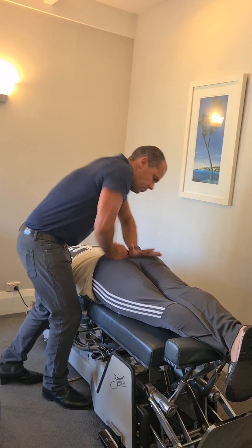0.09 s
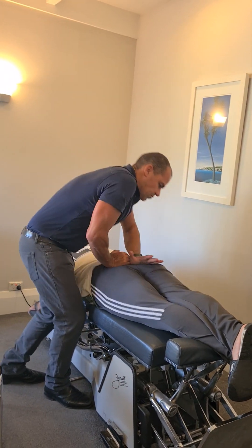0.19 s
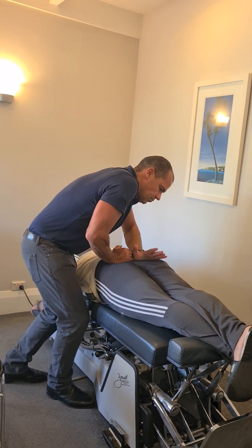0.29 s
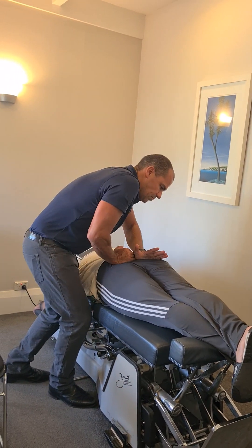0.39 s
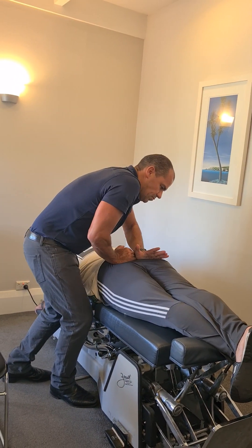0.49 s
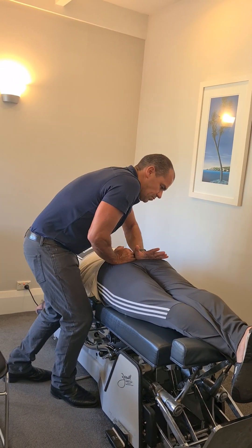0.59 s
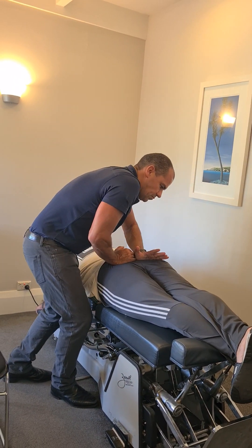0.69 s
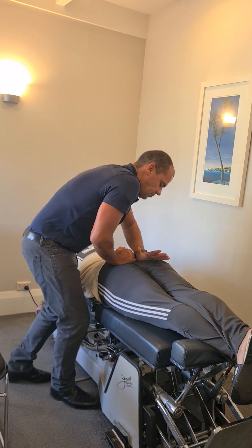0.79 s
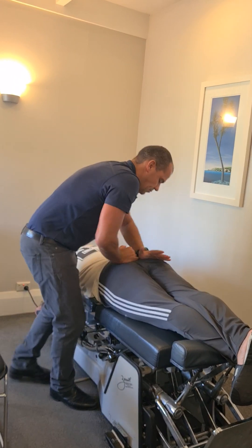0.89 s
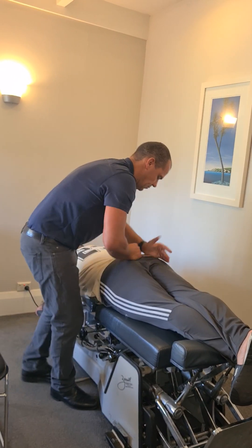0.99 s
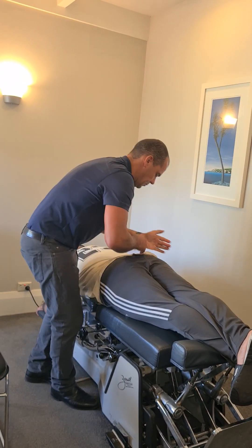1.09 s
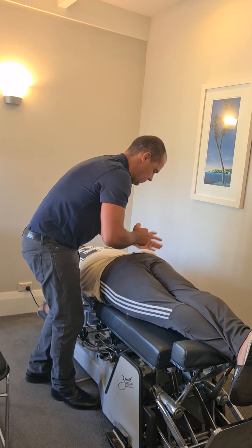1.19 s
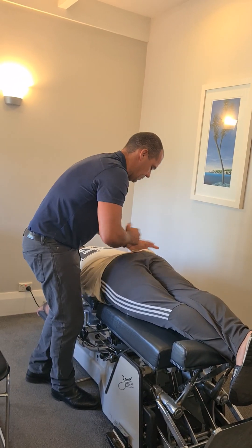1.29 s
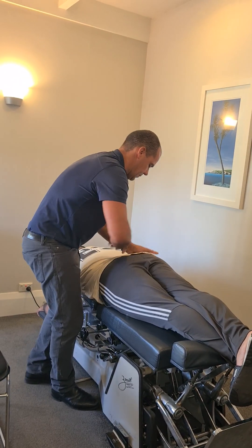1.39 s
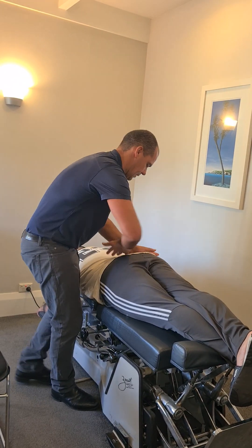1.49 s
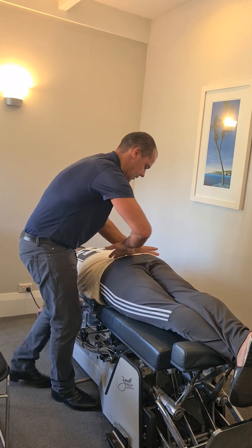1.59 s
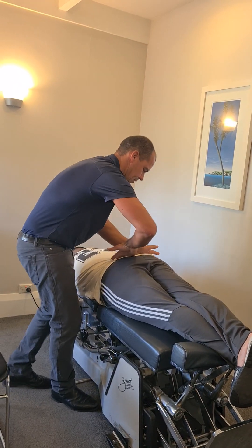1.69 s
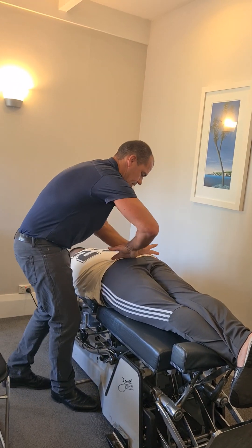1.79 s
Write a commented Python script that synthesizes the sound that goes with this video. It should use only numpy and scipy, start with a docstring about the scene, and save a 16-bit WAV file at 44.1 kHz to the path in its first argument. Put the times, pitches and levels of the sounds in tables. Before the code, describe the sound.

A padded treatment table section drops with a loud clack, then is lifted with clunks and hiss

```python
"""Padded table section dropped and lifted

A padded section of a treatment table drops onto its stop with a loud clack and rattles, in a small quiet room.
A second later the mechanism lifts it: a latch clack, a puff of air, dull thuds, a fading hiss of vented air.
Contacts are filtered impulses that ring the frame's modes; air, cloth and scrapes are shaped, coloured noise.
Decaying sines make the table rock and boom. A faint rustle opens the scene over a low hum and dull room noise."""
import sys
import numpy as np
from scipy import signal
from scipy.fft import rfft, irfft
from scipy.io import wavfile
from scipy.ndimage import uniform_filter1d

SR = 44100
rng = np.random.default_rng(int(sys.argv[2]) if len(sys.argv) > 2 else 0)


def file_out(sig):
    """Save sig as 16-bit WAV at sys.argv[1]."""
    # one column per channel
    cols = np.atleast_2d(sig).T
    # limit, then scale
    lim = np.clip(cols, -1, 1)
    pcm = np.round(lim * 32767).astype(np.int16)
    wavfile.write(sys.argv[1], SR, pcm)


N = 79380

# Stereo width of the room's sound. Each row: frequency in Hz, side level against mid in dB.
SIDE_SHARE = [(50, -21), (170, -20), (350, -9.5), (700, -3.5), (1400, 0.5), (15000, 1)]


def drop_clacks(walls):
    """Impact excitation: the section hits its stop and rebounds, each contact a broadband push."""
    # Each row: start in seconds, level in dB, brightness in dB per octave.
    drop_hits = [(.2424, 35, -2), (.2490, 15.5, 3), (.2575, 22, 3), (.2650, 2, -8), (.2890, 20.5, -5)]
    # Colour of the contact. Each row: frequency in Hz, gain in dB.
    drop_colour = [(40, -29.5), (80, -13.5), (130, -2.5), (200, -2), (290, -2), (400, -8), (500, 2.5),
                   (630, 7.5), (800, -5), (1120, 2), (1400, -4), (2000, -2.5), (2700, -12.5), (5000, -14),
                   (9000, -21.5), (10800, -25.5), (15000, -25)]
    return blows(drop_hits, drop_colour, grind_s=0.0035, ring_db=-55, walls=walls)


def latch_clacks(walls):
    """Impact excitation: the latch catches as the section is lifted, with a shorter chatter than the drop."""
    # Each row: start in seconds, level in dB, brightness in dB per octave.
    latch_hits = [(1.2010, 18, 3), (1.2045, 19, -2), (1.2290, 14.5, -6.5), (1.2585, 5, 7), (1.275, 7, 0.5)]
    # Colour of the contact. Each row: frequency in Hz, gain in dB.
    latch_colour = [(50, -19.5), (130, -5.5), (260, 6.5), (450, -4.5), (800, -4), (1150, 1.5), (1500, -1.5),
                    (2000, -1.5), (2700, -15), (4000, -13.5), (7500, -28), (15000, -34)]
    return blows(latch_hits, latch_colour, grind_s=0.002, ring_db=-55, walls=walls)


def padded_thuds(walls):
    """Cushioned impact: padding at the end of the travel absorbs the treble and leaves a dull bump."""
    # Each row: start in seconds, level in dB, brightness in dB per octave.
    thud_hits = [(.2975, 20.5, -3.5), (1.234, -1, 4), (1.264, 13.5, -4), (1.3020, 23, 1.5), (1.3150, 21, 3),
                 (1.346, -4.5, -8), (1.484, 4, -3), (1.7765, 13.5, .5)]
    # Colour of the contact. Each row: frequency in Hz, gain in dB.
    thud_colour = [(50, -10), (85, 2), (130, 2), (190, 4.5), (260, 7), (360, -0.5), (520, 6.5), (680, 3),
                   (820, -12), (1200, -22.5), (2500, -36.5), (9000, -86.5)]
    return blows(thud_hits, thud_colour, grind_s=0.01, ring_db=-55.5, walls=walls)


def blows(rows, points, grind_s, ring_db, walls):
    """Linear response to impact: a push with a brief chatter fills the room; the push also rings the frame."""
    chatter_db = 3  # energy of the chatter against the push that starts it
    pushes, contacts = 0, 0
    for start, db, tilt_db in rows:
        impulse = np.eye(1, N, int(start * SR))[0]
        push = undb(db) * colour(impulse, points, tilt_db)
        chatter = rng.standard_normal(N) * np.exp(-since(0) / grind_s)
        chatter = undb(chatter_db) * chatter / np.linalg.norm(chatter)
        contact = even(np.eye(1, N)[0] + chatter)
        pushes = pushes + push
        contacts = contacts + convolve(push, contact)
    return convolve(contacts, walls) + undb(ring_db) * convolve(pushes, frame())


def frame():
    """Modal ringing: the steel frame's decaying modes, the higher ones out of step at the two microphones."""
    # Each row: frequency in Hz, relative level in dB, 60 dB decay time in seconds.
    modes = [(176.44, -2, .5), (226, -4, 0.67), (256.5, 2.5, 0.43), (355.4, 1, 0.55), (471.5, -3, .36),
             (491.8, -0.5, 0.36), (616, -6, 0.12), (593, -5, 0.37), (648, -7.5, 0.35), (694, -8, .38),
             (1128, 0, 0.28), (1495, -7, .3), (1946, -5.5, 0.29)]
    rise_s = 0.0068
    t, out = since(0), 0
    for hz, db, t60 in modes:
        lead = np.arctan(undb(at(SIDE_SHARE, hz))) * rng.choice([-1, 1]) * np.array([[1], [-1]])
        out = out + undb(db) * np.cos(2 * np.pi * hz * t + lead) * fade(t, t60)
    return out * (1 - np.exp(-t / rise_s))


def sway():
    """Damped resonance: after each jolt the loaded table rocks deeply and its padded body booms."""
    # Each row: start in seconds, level of the rocking in dB, level of the boom in dB, both before decay.
    jolts = [(.243, -32, -31), (0.293, -21, -18.5), (0.579, -38, -60.5), (0.751, -33, -59),
             (1.188, -22.5, -26.5), (1.286, -19, -23.5), (1.534, -24.5, -40.5), (1.729, -36.5, -49)]
    rock_hz, boom_hz = 45.5, 134.5
    rise_s, rock_t60_s, boom_t60_s = 0.021, 0.45, 0.45
    out = 0
    for start, rock_db, boom_db in jolts:
        t = since(start)
        rock = undb(rock_db) * np.sin(2 * np.pi * rock_hz * t) * fade(t, rock_t60_s)
        boom = undb(boom_db) * np.sin(2 * np.pi * boom_hz * t) * fade(t, boom_t60_s)
        out = out + (rock + boom) * np.minimum(t / rise_s, 1)
    return out


def valves(walls):
    """Turbulent jet noise: short puffs from the valves and the long hiss of the slowly emptying cylinder."""
    # Each row: start in seconds, level in dB before the room, attack in seconds, hold in seconds,
    # decay in dB per second.
    puff_rows = [(1.255, -28, 0.0012, .02, 700), (1.485, -26, .005, 0.028, 223)]
    # Colours of the puffs and of the hiss. Each row: frequency in Hz, relative level in dB.
    puff_colour = [(200, -0.5), (700, 4), (1800, 0.5), (2800, 1.5), (4700, -3), (7000, -0.5), (9000, 5),
                   (10500, -1.5), (12000, 1.5), (14000, 2.5), (16000, 7.5)]
    vent_colour = [(150, 5.5), (600, -19.5), (1300, -8.5), (2500, -4), (3300, -2.5), (4400, 2),
                   (6500, -4.5), (8500, -8.5), (10500, -15), (12300, -8.5), (14000, -3), (16000, -10)]
    direct_db = -10.5  # the valves point into the open
    puffs = sum(rush(rng.standard_normal(N), puff_colour, *row) for row in puff_rows)
    vent = rush(rng.standard_normal(N), vent_colour,
                start=1.482, db=-33, attack=0.012, hold=0.086, fall_db=49)
    air = puffs + vent
    return convolve(air, walls) + undb(direct_db) * air


def slides():
    """Friction noise: the section scrapes in its guides just before the drop and before the latch."""
    # Each row: start in seconds, level in dB, attack in seconds, hold in seconds, decay in dB per second.
    scrapes = [(.219, -35, .022, .002, 900), (1.183, -42, .016, .002, 900)]
    # Colour of the scrape. Each row: frequency in Hz, relative level in dB.
    scrape_colour = [(80, -2), (250, 0), (600, 0), (1300, -4), (2300, -10), (4000, -19), (8000, -24),
                     (15000, -34)]
    return sum(rush(diffuse(), scrape_colour, *row) for row in scrapes)


def cloth():
    """Friction noise: clothes and padding rustle under the hands, soft in the treble."""
    # Each row: start in seconds, level in dB, attack in seconds, hold in seconds, decay in dB per second.
    presses = [(-.03, -48, .02, 0.47, 64)]
    # Colour of the rustle. Each row: frequency in Hz, relative level in dB.
    cloth_colour = [(80, 5.5), (170, 8.5), (350, 1.5), (600, -2.5), (1200, -4.5), (2200, -12),
                    (4800, -20.5), (7000, -29.5), (15000, -34)]
    return sum(rush(diffuse(), cloth_colour, *row) for row in presses)


def rush(noise, points, start, db, attack, hold, fall_db):
    """Amplitude envelope: coloured noise opens linearly, holds and dies away exponentially."""
    opening = np.minimum(since(start) / attack, 1)
    closing = undb(-fall_db * since(start + attack + hold))
    return level(colour(noise, points), db) * opening * closing


def hum():
    """Line spectrum: steady tones of a machine, each wavering slowly in level."""
    # Each row: frequency in Hz, middle level in dB.
    lines = [(48.4, -46), (96.9, -58), (242.2, -54), (538, -70), (598, -67)]
    waver_db = 2
    t, out = since(0), 0
    for hz, db in lines:
        strength = undb(db + waver_db * walk(11))
        out = out + strength * np.sin(2 * np.pi * (hz * t + rng.random()))
    return out


def room_noise():
    """Diffuse sound field: steady dull noise arriving from all around."""
    # Each row: frequency in Hz, relative level in dB per Hz.
    noise_colour = [(20, -4), (44, -5.5), (70, -17.5), (170, -8), (260, -17), (400, -20.5), (600, -22.5),
                    (1100, -24), (2000, -35.5), (3200, -42.5), (5000, -55.5), (15000, -73.5)]
    return level(colour(diffuse(), noise_colour), -49)


def diffuse():
    """Spatial coherence: noise at two microphones, alike in the bass and unrelated in the treble."""
    mid, side = rfft(rng.standard_normal((2, 2 * N)))
    share = undb(at(SIDE_SHARE, bins()))
    left_right = mid + share * side * np.array([[1], [-1]])
    return irfft(left_right / np.sqrt(1 + share ** 2))[:, :N]


def room():
    """Reverberation: direct sound, then reflections that build up and decay octave by octave."""
    # Each row: frequency in Hz, 60 dB decay time in seconds.
    decay_times = [(60, 0.79), (130, 0.37), (250, 0.44), (500, 0.38), (1000, .4), (2000, .37), (4000, 0.3),
                   (8000, 0.29), (15000, 0.2)]
    # Direct sound against the reflections; the table shades the treble.
    # Each row: frequency in Hz, relative level in dB.
    direct_colour = [(60, -7), (500, -3), (1200, -9), (3000, -20), (15000, -24)]
    gap_s, build_s = 0.00033, 0.0037
    t, noise, tail = since(gap_s), rfft(diffuse(), 2 * N), 0
    centres = 62.5 * 2. ** np.arange(9)
    for hz in centres:
        octaves_away = np.minimum(abs(np.log2(np.clip(bins(), centres[0], centres[-1]) / hz)), 1)
        mask = np.cos(np.pi / 2 * octaves_away) ** 2
        band = irfft(noise * mask)[:, :N]
        # smooth the band's chance swings in level before it decays
        power = uniform_filter1d(np.mean(band ** 2, axis=0), size=700)
        band = band / np.sqrt(power + 1e-18)
        shape = (1 - np.exp(-t / build_s)) * fade(t, at(decay_times, hz))
        tail = tail + band * shape * np.sqrt(np.mean(mask ** 2) / np.sum(shape ** 2))
    return even(colour(np.eye(1, N), direct_colour) + tail)


def undb(db):
    """Logarithmic level: decibels to amplitude gain."""
    return 10 ** (np.asarray(db) / 20)


def level(x, db):
    """Root-mean-square level: scale a sound to it."""
    return x * undb(db) / np.sqrt(np.mean(x ** 2))


def at(points, hz):
    """Logarithmic pitch scale: read a table by interpolating along log frequency."""
    f, v = np.array(points, float).T
    return np.interp(np.log(np.maximum(hz, 1)), np.log(f), v)


def bins():
    """Discrete spectrum: frequencies for twice the scene's length."""
    return np.arange(N + 1) * SR / (2 * N)


def colour(x, points, tilt_db=0):
    """Minimum-phase filtering: a causal filter through (Hz, dB) points, with a tilt in dB per octave."""
    # the tilt turns about 700 Hz and levels off below 120 Hz and above 5 kHz
    gain_db = at(points, bins()) + tilt_db * np.log2(np.clip(bins(), 120, 5000) / 700)
    # folding the cepstrum onto positive time makes the filter causal
    cepstrum = irfft(np.log(undb(gain_db)))
    cepstrum[1:N] *= 2
    cepstrum[N + 1:] = 0
    return irfft(rfft(x, 2 * N) * np.exp(rfft(cepstrum)))[..., :N]


def even(x):
    """Spectral whitening: level a burst's spectrum in bands about 40 Hz wide, to near unit energy."""
    spectrum = rfft(x, 2 * N)
    power = np.atleast_2d(abs(spectrum) ** 2).mean(axis=0)
    for _ in range(3):
        power = uniform_filter1d(power, size=int(40 * 2 * N / SR))
    return irfft(spectrum / np.sqrt(abs(power) + 1e-12))[..., :N]


def convolve(x, response):
    """Linear superposition: play a sound through an impulse response."""
    return irfft(rfft(x, 2 * N) * rfft(response, 2 * N))[..., :N]


def since(start):
    """Causality: seconds since a moment, zero before it."""
    return np.maximum(np.arange(N) / SR - start, 0)


def fade(t, t60):
    """Exponential damping: decay by 60 dB in t60 seconds."""
    return np.exp(-np.log(1000) * t / t60)


def pan(x, db):
    """Level difference between ears: make the left channel louder than the right by db."""
    return x * undb(np.array([[db], [-db]]) / 2)


def walk(rate):
    """Slow random modulation: straight lines between random values, rate of them per second."""
    k = int(SR / rate)
    return uniform_filter1d(np.repeat(rng.standard_normal(N // k + 1), k), k)[:N]


def scene():
    """Superposition: the drop, the lift and the venting air in one small room."""
    walls = room()
    clacks = pan(drop_clacks(walls) + latch_clacks(walls), -1)
    thuds = padded_thuds(walls)
    air = pan(valves(walls), 0.2)
    return clacks + thuds + sway() + air + slides() + cloth() + hum() + room_noise()


def record(dry):
    """Soft saturation and band limiting: round the loudest peaks, then cut the top."""
    ceiling, top_hz = 1, 15900
    rounded = ceiling * np.tanh(dry / ceiling)
    low_pass = signal.ellip(10, .2, 80, top_hz, fs=SR, output="sos")
    return signal.sosfilt(low_pass, rounded)


dry = scene()
out = record(dry)
file_out(out)
```